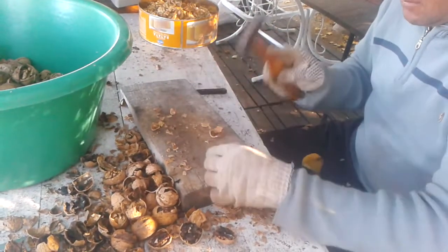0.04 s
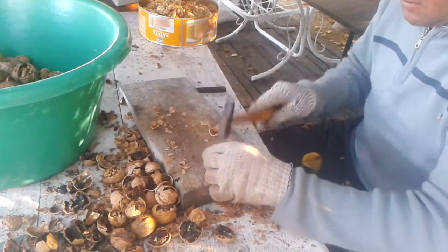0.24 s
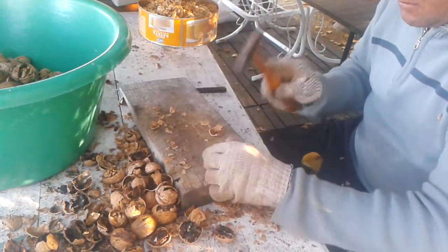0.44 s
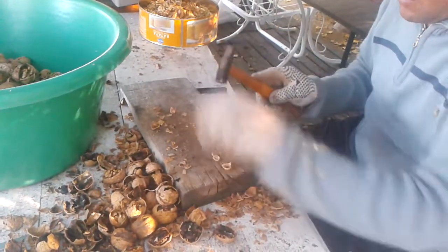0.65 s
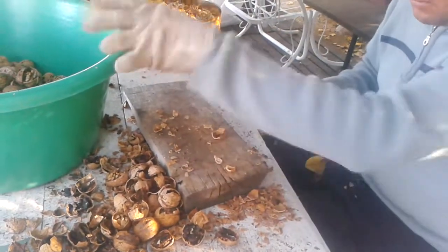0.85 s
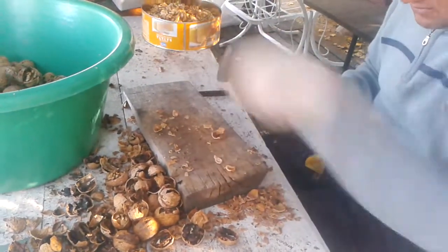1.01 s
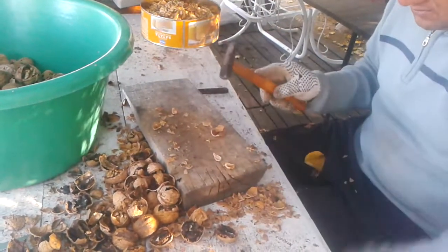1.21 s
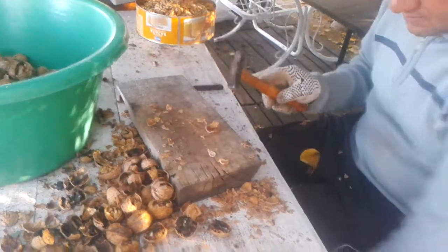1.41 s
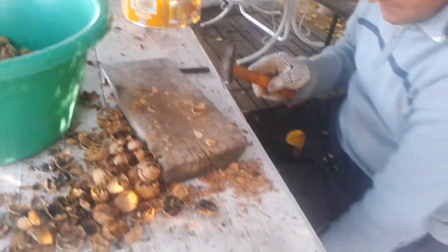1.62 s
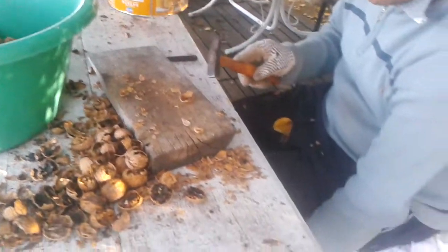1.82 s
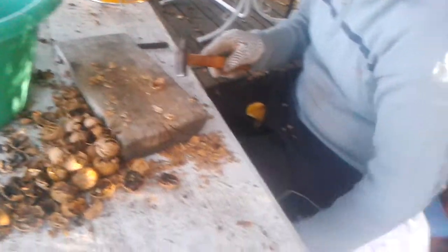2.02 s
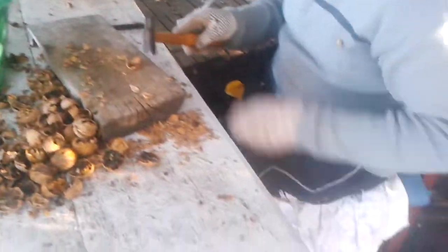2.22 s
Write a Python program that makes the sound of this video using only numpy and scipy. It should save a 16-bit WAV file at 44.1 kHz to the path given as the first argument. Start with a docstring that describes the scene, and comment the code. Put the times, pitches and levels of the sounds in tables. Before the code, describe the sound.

A hammer cracks a walnut on a wooden block at about 0.2 seconds, one loud, sharp knock with a short echo. Shell splinters patter down until 0.8 seconds. A few light clicks follow, and the tossed nut lands with a dull bump near 1.2 seconds. From 1.4 seconds to around 2.3, a gloved hand stirs dry shells, which rattle and click quietly over faint outdoor air.

```python
"""A hammer cracks a walnut on a wooden block on an outdoor table; the blow overloads the microphone.
The shell snaps, and the block rings and knocks against the table. Splinters patter down, the nut is
tossed and lands with a dull bump, and a gloved hand rummages through a heap of dry shells, which
scrape and click against each other. A porch adds a short echo; behind it all are soft outdoor air,
a far-off hum and the recorder's faint whine."""
import sys
import numpy as np
from scipy import signal
from scipy.fft import rfft, irfft, next_fast_len
from scipy.io import wavfile

SR = 44100
rng = np.random.default_rng(int(sys.argv[2]) if len(sys.argv) > 2 else 0)


def unload_audio(sound):
    """Save the sound as a 16-bit wav file, at the path given as the first command line argument."""
    columns = np.transpose(np.atleast_2d(sound))
    # keep every value between -1 and 1, then stretch to whole-number steps
    steps = np.round(np.clip(columns, -1, 1) * 32767)
    wavfile.write(sys.argv[1], SR, steps.astype(np.int16))


N = 103635
TIME = np.arange(N) / SR
BUMP_CONTACT_S = 0.0016   # a long contact makes a dull sound


def hammer_blow():
    """The shell breaks, and the blow rings the block and knocks it against the table."""
    # quick breaks in the shell: (time [s], level [dB], pitch [Hz], length [s], tick level [dB])
    fractures = [(0.1999, -27, 2750, 0.0016, -30), (0.2019, -6, 3353, 0.0013, -14.5),
                 (0.2029, -3.5, 1652, 0.0024, -11), (0.2064, -18, 3500, 0.0052, -1.5)]
    # the notes of block and table: (pitch [Hz], level [dB], ring time [s])
    block_notes = [(44.4, -42, .12), (100, -26.5, 0.17), (196, -21.5, 0.16), (257, -11, 0.035),
                   (315.5, -20, 0.08), (397, -22, .13), (559, -18, .11), (622, -19.5, .095),
                   (815, -24.5, 0.069), (943, -20.5, .12), (1236, -1, 0.036), (1409, 2, 0.038),
                   (1505, -17.5, .1), (1687, -3.5, 0.04), (1860, -3.5, .036), (3230, -8.5, 0.036),
                   (3620, -10, .04)]
    out, force = np.zeros(N), np.zeros(N)
    for s, *click in fractures:
        add(out, s, shell_click(*click))
    # the hammer head drives the nut into the block
    add(force, .2030, from_db(-0.5) * push(length_s=0.00033))
    # the block hits the table: one low swing that dies fast
    add(out, .2082, from_db(-0.5) * ring(push(BUMP_CONTACT_S), hz=262, ring_s=.028))
    for k, (hz, db, ring_s) in enumerate(block_notes):
        out += (-1) ** k * from_db(db) * ring(force, hz, ring_s)   # every other note starts downward
    return out


def shell_click(db, hz, length_s, tick_db):
    """A snap and a dying chatter of tiny slips ring a shell and the table under it."""
    # the notes of a shell: (multiple of its pitch, level [dB], ring time [s])
    shell_notes = [(.57, -5.5, 0.0094), (.80, 0, 0.0089), (1.03, 6, .009), (1.30, 1.5, 0.009),
                   (1.62, -2.5, 0.0064), (2.1, -13, 0.0074)]
    # the tone of the ringing shell: (frequency [Hz], level [dB])
    shell_tone = [(200, 3.5), (3600, 0), (4500, -3.5), (5600, -11), (9000, -13), (16000, -24)]
    # the bright tick of the contact: (frequency [Hz], level [dB])
    tick_tone = [(1000, -10), (4000, 5), (6200, -7), (8500, 3), (12000, -3.5), (16000, -8.5)]
    # the low thud of the table: (frequency [Hz], level [dB])
    table_tone = [(80, -14.5), (260, 7.5), (650, -4), (1200, -5), (3000, -38)]
    slips_per_s, typical_contact_s = 9000, 0.0021
    t = TIME[:SR // 20]
    slips = rng.standard_normal(len(t)) * (rng.random(len(t)) < slips_per_s / SR)
    slips *= np.exp(-(t / length_s) ** 2 / 2)
    force = 1.7 * slips / (np.linalg.norm(slips) + 1e-9)
    force[0] = 1   # the first snap
    pitches = hz * np.exp(.015 * rng.standard_normal(len(shell_notes)))   # no two shells are alike
    ringing = sum((-1) ** k * from_db(level) * ring(force, multiple * pitches[k], ring_s)
                  for k, (multiple, level, ring_s) in enumerate(shell_notes))
    shell = coloured(ringing, shell_tone)
    tick = from_db(tick_db) * coloured(force, tick_tone)
    # longer contacts push the table harder
    thud = from_db(-19.5) * np.sqrt(length_s / typical_contact_s) * coloured(force, table_tone)
    return from_db(db) / np.sqrt(10) * (shell + tick + thud)   # level as if these 50 ms fell in 5 ms


def crunch():
    """The nut grinds on the block, is crushed and crumbles: bursts of small breaks with no pitch."""
    # the bursts: (time [s], level [dB], time to fade by 60 dB [s])
    bursts = [(.050, -40, 0.057), (0.206, -22, 0.16), (.313, -37, .05), (.519, -49, 0.094)]
    # the tone of the crunch: (frequency [Hz], level [dB])
    crunch_tone = [(200, -7), (700, 1), (1600, -0.5), (2500, -8.5), (3400, -9.5), (6500, -23.5),
                   (9500, -17), (16000, -27.5)]
    loudness = np.zeros(N)
    for s, db, fade_s in bursts:
        add(loudness, s, from_db(db) * fade(TIME, fade_s))
    return loudness * coloured(tiny_hits(per_s=1100), crunch_tone)


def crumbs():
    """Fine crumbs trickle over the block after the blow, faint and bright."""
    # how loud the trickle is: (time [s], level [dB])
    trickle = [(.305, -54), (.316, -48), (.345, -53.5), (.365, -52), (.40, -65), (.45, -59), (.52, -66),
               (.60, -73)]
    # the tone of the crumbs: (frequency [Hz], level [dB])
    crumb_tone = [(1000, -9), (3000, -1.5), (6500, -16), (9000, 5.5), (12500, -3), (15000, -1.5)]
    return level_curve(trickle) * coloured(tiny_hits(per_s=1700), crumb_tone)


def loose_shells():
    """Shells and splinters knock together, one click at a time."""
    # the knocks: (time [s], level [dB], pitch [Hz], length [s], tick level [dB])
    clicks = [(0.1157, -39, 2230, 0.0045, -14.5), (0.233, -29.5, 1440, 0.0036, -24),
              (0.244, -36, 1400, .003, -22), (.2555, -34.5, 1550, .003, -25),
              (0.266, -36, 1920, 0.0048, -28), (0.2846, -38.5, 2100, 0.0024, -8),
              (0.453, -48.5, 2070, 0.0074, -15), (0.474, -51, 2150, 0.0055, -3),
              (0.519, -45.5, 1290, 0.0046, -21), (0.575, -43, 2130, 0.006, -15),
              (0.757, -50, 3160, .002, -9), (1.0160, -34.5, 2650, 0.0008, -3),
              (1.0176, -33.5, 3300, .0008, -3.5), (1.0189, -33.5, 2167, 0.0012, -1),
              (1.0315, -44.5, 2300, 0.0025, 2.5), (1.119, -55.5, 2810, 0.0018, 8.5),
              (1.1859, -37, 2760, 0.0044, -15.5), (1.1923, -38.5, 1090, 0.0027, -14),
              (1.303, -46, 1600, 0.0041, -5.5), (1.248, -28, 1330, .001, -22),
              (1.2487, -31, 2650, .0007, -12), (1.435, -39.5, 2470, 0.0057, -37),
              (1.4492, -31, 2230, 0.007, -20), (1.528, -42.5, 1690, 0.0059, -32),
              (1.588, -41, 1820, 0.0047, -34), (1.648, -37, 2300, 0.0081, -21),
              (1.695, -42, 1780, 0.0052, -22), (1.709, -40, 1950, 0.0037, -30),
              (1.7365, -31.5, 1700, .004, -26), (1.76, -26.5, 2060, 0.0054, -15),
              (1.785, -34.5, 1900, 0.0024, -24), (1.811, -38.5, 1750, 0.0025, -28),
              (1.857, -30.5, 1890, 0.0045, -30), (1.867, -39.5, 1960, 0.0069, -30),
              (1.9561, -35.5, 1960, 0.0018, -22), (1.976, -37.5, 1800, 0.0053, -20),
              (1.991, -33.5, 1950, 0.0043, -19), (2.036, -28.5, 2040, 0.004, -21),
              (2.049, -38.5, 2250, 0.0042, -30), (2.0649, -34, 1980, 0.0082, -24),
              (2.12, -43, 2200, 0.0017, -14), (2.2208, -38.5, 2150, 0.0022, -20),
              (2.2972, -33, 2030, 0.0023, -12), (2.314, -41.5, 2480, .003, -27),
              (2.3402, -34, 2470, 0.0049, -11), (2.3425, -23.5, 2280, 0.00083, -59)]
    out = np.zeros(N)
    for s, *click in clicks:
        add(out, s, shell_click(*click))
    return out


def tossed_nut():
    """The nut lands and rolls over with soft, hollow bumps."""
    # the push of each bump: (time [s], strength [dB])
    bumps = [(1.1583, -28), (1.167, -32), (1.178, -31), (1.199, -35.5)]
    # the notes a bump sets ringing: (pitch [Hz], level [dB], ring time [s])
    bump_notes = [(156.5, -11, 0.22), (215, 4, 0.048), (243, -16, 0.05), (302, -5, 0.097), (667, -4, 0.025),
                  (1124, 2, 0.023)]
    force = np.zeros(N)
    for s, db in bumps:
        add(force, s, from_db(db) * push(BUMP_CONTACT_S))
    return sum(from_db(db) * ring(force, hz, ring_s) for hz, db, ring_s in bump_notes)


def rummaging():
    """A hand stirs the heap, and shells of many sizes collide in a dense rattle."""
    # how hard the hand stirs: (time [s], level [dB])
    stirring = [(1.425, -71.5), (1.444, -40.5), (1.475, -44), (1.511, -64.5), (1.534, -43.5), (1.565, -50),
                (1.589, -42.5), (1.642, -40.5), (1.68, -57.5), (1.71, -38), (1.745, -40.5), (1.769, -34),
                (1.83, -43.5), (1.89, -48.5), (1.92, -41), (2.01, -47), (2.06, -53), (2.105, -71)]
    # the tone of the stirred heap: (frequency [Hz], level [dB])
    heap_tone = [(100, -13.5), (240, -4.5), (600, -8.5), (1200, -7.5), (1900, -4.5), (2900, -10.5),
                 (4100, -20.5), (5600, -39.5), (6800, -38), (7900, -27.5), (11000, -31.5), (16000, -46)]
    hits = tiny_hits(per_s=2500)
    pitches, ring_cycles = np.geomspace(900, 4200, 16), 11
    which_shell = rng.integers(0, len(pitches), N)
    ringing = sum(unit_level(ring(hits * (which_shell == k), hz, ring_cycles / hz))
                  for k, hz in enumerate(pitches))
    rattle = unit_level(hits) + 0.22 * unit_level(ringing)
    return level_curve(stirring) * coloured(rattle, heap_tone)


def glove():
    """Knitted cloth brushes over dry shells with an airy scrape."""
    # how loud the brushing is: (time [s], level [dB])
    brushing = [(1.72, -66), (1.767, -45), (1.83, -81), (1.89, -68), (1.955, -63), (1.982, -53),
                (2.04, -72)]
    # the tone of the scrape: (frequency [Hz], level [dB])
    brush_tone = [(4700, -8), (6300, -24), (7600, 2.5), (15500, -5.5)]
    return level_curve(brushing) * coloured(tiny_hits(per_s=2500), brush_tone)


def porch(x):
    """Sound bounces off the nearby table and tub, then dies away around the porch."""
    # the porch's echo: (frequency [Hz], level [dB], time to fade by 60 dB [s])
    tail = [(118.3, -19.5, 0.19), (299.8, -19, 0.31), (700, -12, 0.26), (1480, -22, .25), (3200, -23, .21),
            (6210, -22, 0.23), (10100, -16.5, 0.2), (15000, -21.5, .2)]
    near_db, near_fade_s, delay_s = -14.5, 0.038, .003
    t = TIME[:SR // 2]
    edges_hz = 50 * 2 ** np.arange(0, 8.6, .5)   # bands half an octave wide
    noise, echo = rng.standard_normal((2, len(t))), np.zeros(len(t))
    for k, (low, high) in enumerate(zip(edges_hz, edges_hz[1:])):
        hz = np.sqrt(low * high)
        band = signal.sosfilt(signal.butter(2, [low, high], "band", fs=SR, output="sos"), noise[k % 2])
        share = np.sqrt(2 * (high - low) / SR / len(t))   # wider bands carry more energy
        for db, fade_s in ((at_hz(tail, hz), at_hz(tail, hz, column=2)), (near_db, near_fade_s)):
            echo += share * from_db(db) * unit_level(band * fade(t, fade_s))
    out = x.copy()
    add(out, delay_s, signal.fftconvolve(x, echo))
    return out


def background():
    """Steady outdoor air, with a faint far-off hum that swells."""
    # how loud the hum is: (time [s], level [dB])
    swell = [(0, -73.5), (1.4, -72.5), (1.95, -67), (2.36, -65)]
    # the tone of the outdoor air: (frequency [Hz], level [dB])
    air_tone = [(25, -9.5), (65, -6.5), (110, -12), (200, -9.5), (330, -10), (450, -11), (600, -9.5),
                (900, -14.5), (2200, -18), (3400, -22), (4500, -26), (9000, -30), (16000, -35.5)]
    hum = level_curve(swell) * pure_tone(hz=577)
    return hum + from_db(-58) * coloured(rng.standard_normal(N), air_tone)


def push(length_s):
    """The smooth rise and fall of force in one contact; it adds up to 1."""
    t = TIME[:SR // 20] / length_s
    force = t ** 2 * np.exp(-2 * np.pi * t)
    return force / force.sum()


def ring(force, hz, ring_s):
    """One note of a struck object: each hit starts a swing that fades by 60 dB in ring_s."""
    decay, angle = fade(1 / SR, ring_s), 2 * np.pi * hz / SR   # both per sample
    return signal.lfilter([.5, 0, -.5], [1, -2 * decay * np.cos(angle), decay * decay], force + 1e-18)


def tiny_hits(per_s):
    """Tiny hits at random times and of uneven size, in louder and softer clumps."""
    clump_s, clump_db, spread_db = .004, 1.5, 3
    clump_times = np.arange(0, TIME[-1] + clump_s, clump_s)
    levels_db = clump_db * np.interp(TIME, clump_times, rng.standard_normal(N)[:len(clump_times)])
    levels_db += spread_db * np.minimum(rng.exponential(1, N), 3)
    sizes = from_db(levels_db) * rng.choice([-1, 1], N)
    return sizes * (rng.random(N) < per_s / SR)


def coloured(x, tone):
    """Give x the tone in a (frequency [Hz], level [dB]) table, then scale it to level 1."""
    size = 2 * next_fast_len(len(x))
    gains = from_db(at_hz(tone, np.arange(size // 2 + 1) * SR / size))
    # fold the filter forward in time (minimum phase), so nothing sounds before its hit
    folded = irfft(np.log(gains))
    folded[1:size // 2] *= 2
    folded[size // 2 + 1:] = 0
    return unit_level(irfft(rfft(x, size) * np.exp(rfft(folded)))[:len(x)])


def at_hz(rows, hz, column=1):
    """Read between a table's rows at a frequency, with octaves evenly spaced."""
    table = np.array(rows)
    return np.interp(np.log(np.maximum(hz, 1)), np.log(table[:, 0]), table[:, column])


def level_curve(rows):
    """Loudness that follows (time [s], level [dB]) rows and is silent outside them."""
    s, db = np.transpose(rows)
    return from_db(np.interp(TIME, s, db)) * (TIME > s[0]) * (TIME < s[-1])


def fade(t, fade_s):
    """Fall from 1 to a thousandth (by 60 dB) in fade_s."""
    return np.exp(-np.log(1000) * t / fade_s)


def pure_tone(hz):
    """A steady sine wave at level 1."""
    return np.sqrt(2) * np.sin(2 * np.pi * hz * TIME)


def from_db(db):
    """Turn decibels into a number to multiply by."""
    return 10 ** (np.asarray(db) / 20)


def unit_level(x):
    """Scale x so its average level (rms) is 1."""
    return x / np.sqrt(np.mean(x ** 2) + 1e-20)


def add(out, s, x):
    """Mix x into out, starting at s seconds."""
    i = int(np.clip(s * SR, 0, N - 1))
    out[i:i + len(x)] += x[:N - i]


def scene():
    """All the work on the table, with its echo, over the outdoor background."""
    cracking = hammer_blow() + crunch() + crumbs()
    work = cracking + loose_shells() + tossed_nut() + rummaging() + glove()
    return (porch(work) + background())[None]


def record(dry):
    """The recorder whines faintly, flattens the loud blow and cuts off the highest treble."""
    ceiling, sharpness, cutoff_hz = .70, 6.0, 15750
    x = dry + from_db(-67) * pure_tone(hz=13207)
    flattened = x / (1 + np.abs(x / ceiling) ** sharpness) ** (1 / sharpness)
    return signal.sosfilt(signal.ellip(10, .1, 80, cutoff_hz, fs=SR, output="sos"), flattened)


dry = scene()
out = record(dry)
unload_audio(out)
```